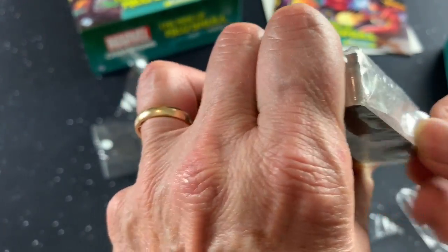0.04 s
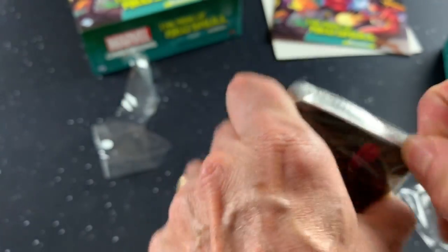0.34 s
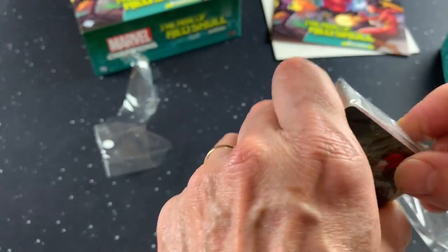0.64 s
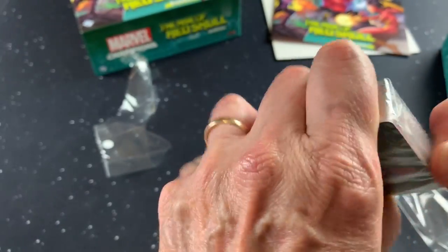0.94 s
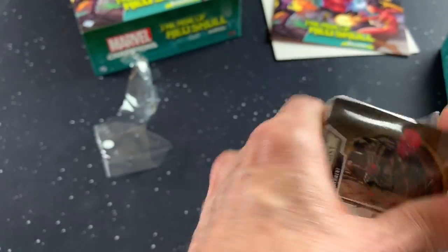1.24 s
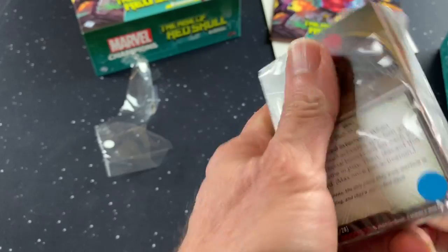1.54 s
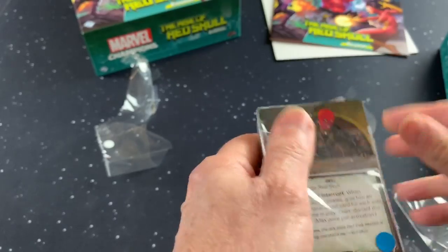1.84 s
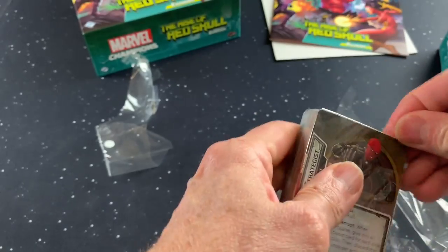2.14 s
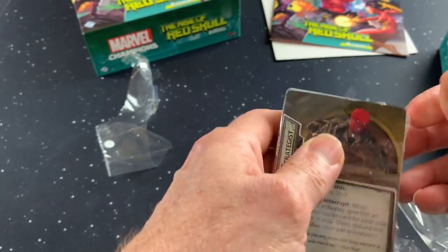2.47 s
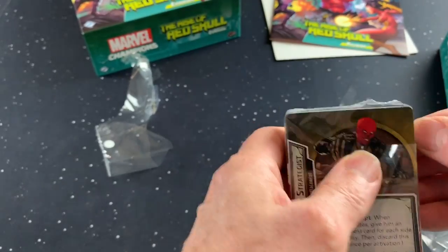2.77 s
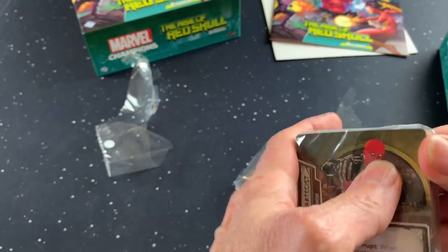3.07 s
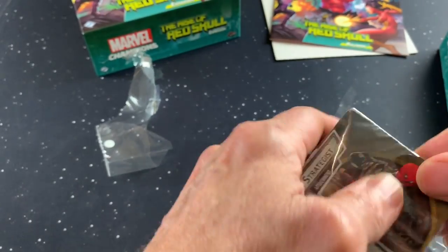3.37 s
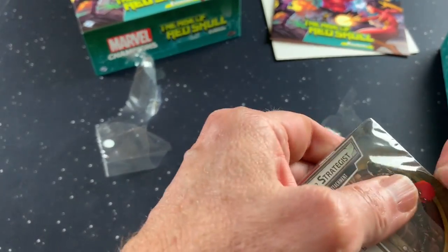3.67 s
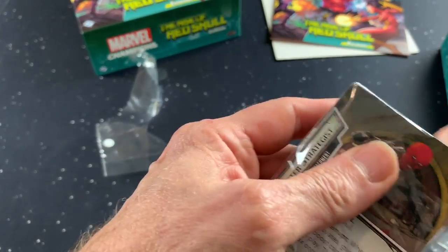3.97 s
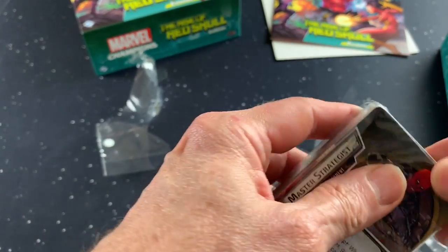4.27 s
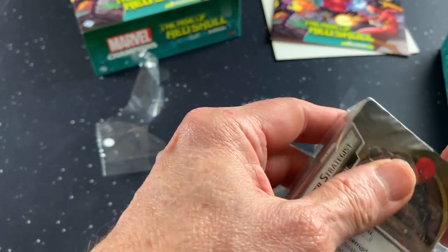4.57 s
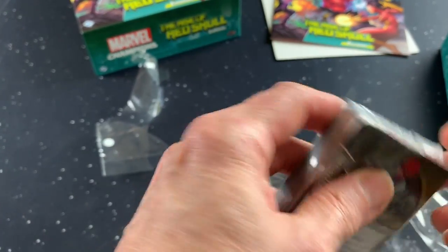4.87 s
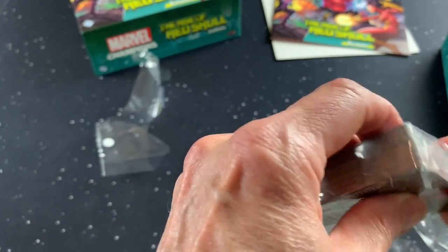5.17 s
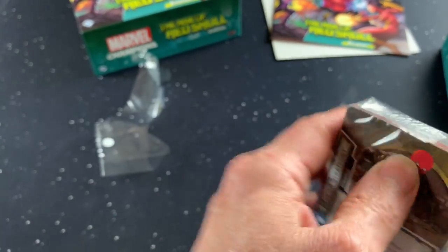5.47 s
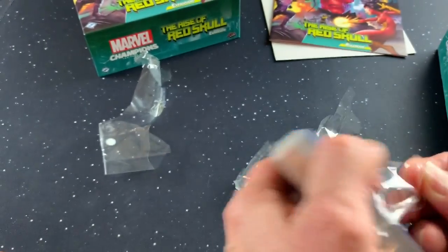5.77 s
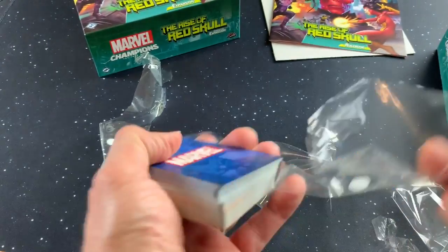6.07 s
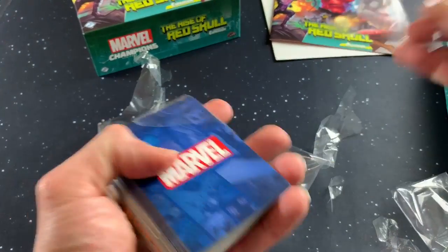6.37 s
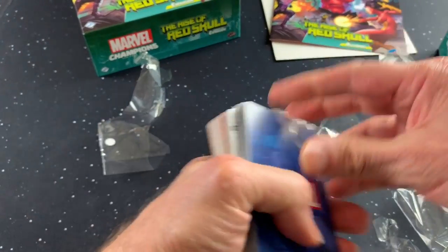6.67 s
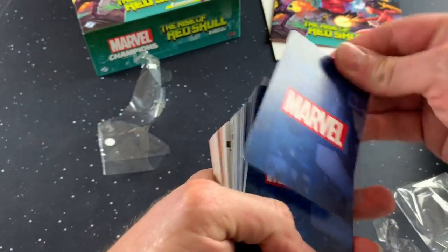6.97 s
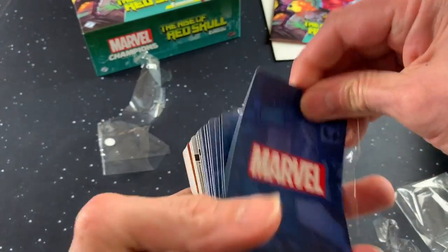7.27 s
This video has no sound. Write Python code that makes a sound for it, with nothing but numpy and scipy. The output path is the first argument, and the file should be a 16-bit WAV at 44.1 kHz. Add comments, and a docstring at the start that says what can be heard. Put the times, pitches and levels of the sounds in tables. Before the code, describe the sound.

Thin plastic wrap crackles and snaps as it is peeled off a deck of cards, with a low rumble from halfway.

```python
"""Shrink-wrap crinkles as it is picked open, peeled off a deck of cards and crumpled.
Each finger stroke buckles tiny creases into a fine crackle; larger creases snap, wide folds ring briefly.
Film and cards slide with a soft hiss and a few short rasps, and the deck rubs and bumps in the hand.
It all plays close to a two-port microphone on a table in a small room; a low rumble sets in halfway."""
import sys
import numpy as np
from scipy import signal
from scipy.fft import rfft, irfft, next_fast_len
from scipy.io import wavfile
from scipy.ndimage import uniform_filter1d, map_coordinates

SR = 44100
rng = np.random.default_rng(int(sys.argv[2]) if len(sys.argv) > 2 else 0)


def materialize(psi):
    """Save the field psi as 16-bit PCM at rate SR to the path in sys.argv[1].

    A 1-D psi becomes a single channel; in a 2-D psi each row is a channel.
    """
    bounded = np.clip(np.atleast_2d(psi).T, -1, 1)
    quanta = np.round(bounded * 32767).astype(np.int16)
    wavfile.write(sys.argv[1], SR, quanta)


N = 326781
TOP_HZ = 16700

# The four voices of the wrap. Each row: frequency in Hz, spectral density in dB.
TREBLE = [(5000, -109.5), (7600, -41), (8100, 4), (11000, 6), (12500, 2), (14000, -0.5), (15600, -2.5),
          (16100, -47), (17000, -3)]  # tiny facets of film
MIDDLE = [(1500, -56), (2500, 0), (3200, -1.5), (5000, 4.5), (7500, 8.5), (8300, 4.5), (11000, -96)]  # wider folds
BODY = [(40, -28), (200, -9.5), (500, -9), (850, -1), (1150, -67), (1700, 2), (2300, 0), (2900, 3.5),
        (3400, 5.5), (6000, -15)]  # the sheet lying on the deck
POCKET = [(60, -27), (140, -39), (400, -38), (650, -53), (870, -11), (1020, 2.5), (1180, 6), (1400, 6.5),
          (1600, 6.5), (1820, -6.5), (2300, 2), (3100, -37), (4500, -4)]  # air cupped under the loosened wrap
# How far the wrap cups into that pocket. Each row: time in seconds, share from 0 to 1.
CUPPED = [(0.2, 0.43), (0.225, 1), (0.55, 0.86), (0.6, 0.34), (1.1, 0.92), (1.2, 1), (1.62, 0.99),
          (1.75, 0.8)]
# Stereo width. Each row: frequency in Hz, each port's own sound in dB relative to the shared sound.
WIDTH = [(300, -12), (1400, -11), (2400, -1), (5000, 5), (7500, 2), (9500, -9)]


def amp(db):
    """Decibels to gain."""
    return 10 ** (np.asarray(db) / 20)


def unit(x):
    """Scale to rms 1."""
    return x / np.sqrt(np.mean(x ** 2) + 1e-20)


def along(points, hz):
    """Read (Hz, value) points on a log frequency axis."""
    knots_hz, values = np.transpose(points)
    return np.interp(np.log(hz + 1), np.log(knots_hz + 1), values)


def curves(rows, times):
    """Read each column after the time column at the given times."""
    knots_s, *columns = np.transpose(rows)
    return [np.interp(times, knots_s, column) for column in columns]


def filtered(x, response):
    """Shape x with a frequency response."""
    size = next_fast_len(N + 8192)
    return irfft(rfft(x, size) * response(np.fft.rfftfreq(size, 1 / SR)), size)[..., :N]


def noise(spectrum, width_db):
    """Coloured stereo noise of rms 1: a shared part plus each port's own."""
    pair = rng.standard_normal(N) + amp(width_db) * rng.standard_normal((2, N))
    return unit(filtered(pair, lambda hz: amp(along(spectrum, hz))))


def wobble(times, rate_hz):
    """A smooth random curve read at the given times."""
    return map_coordinates(rng.standard_normal(int(N * rate_hz / SR) + 4), [times * rate_hz])


def swells(rows, attack_s, sag_db_per_s, release_db_per_s):
    """A coarse clock and the power of each (start, hold, dB) gesture: rise, sagging hold, release."""
    t = np.arange(0, N, 64) / SR
    start, hold, db = np.transpose(rows)[:3, :, None]
    rise = np.clip((t - start) / attack_s + 1, 0, 1) ** 2
    sag_db = sag_db_per_s * (np.clip(t - start, 0, hold) - hold / 2)
    release_db = release_db_per_s * np.maximum(t - start - hold, 0)
    return t, (rise * amp(db - sag_db - release_db)) ** 2


def finger_work(times, grip_db=-61, grip_middle_db=-4, grip_body_db=-10):
    """Strokes work the film over a steady grip: treble in dB, then middle and body in dB relative to it."""
    # Pulls and squeezes. Each row: start and hold in seconds, treble in dB,
    # middle and body in dB relative to the treble.
    strokes = [(.005, .03, -50, 0, -10.5), (.06, .03, -44, -9, -7), (.12, .055, -39, 0.5, -5.5),
               (.18, .02, -30, -26, -13), (0.216, .025, -36, -23, -18), (.26, .01, -31, -13.5, -22),
               (0.294, .075, -36, -21, -18), (0.413, .05, -38, -17, -16.5), (.49, .04, -45, -13, -19),
               (0.614, .015, -47, -7, -5.5), (0.702, .035, -37, -17, -12), (.82, .05, -43, -3.5, -7.5),
               (0.939, .075, -28, -6, -13), (1.029, .04, -40, -19, -11), (1.171, .11, -39, -13, -14.5),
               (1.298, .1, -28, -15.5, -20.5), (1.515, .11, -41, -22, -21), (1.819, .05, -45, -8, -8.5),
               (1.929, .1, -44, -4.5, -7.5), (2.078, .035, -48, -7, -9.5), (2.185, .01, -50, -1, 2),
               (2.277, .035, -37, -10, -8), (2.445, .012, -46, -9, -24), (2.578, .07, -51, -5, -3.5),
               (2.679, .04, -47, 0.5, -6), (2.848, .03, -45, -2, -7), (2.934, .09, -42, -7.5, -7),
               (3.11, .07, -45, -5, -4.5), (3.225, .045, -48, -1.5, -10), (3.317, .04, -50, 1, -5),
               (3.391, .08, -45, -3.5, -7.5), (3.719, .01, -40, -14, -16), (3.765, .135, -41, -3.5, -8),
               (3.929, .035, -48, -8, -7), (4.125, .05, -45, -5.5, -10.5), (4.236, .03, -47, -10, -13.5),
               (4.29, .035, -52, 4, -10), (4.407, .04, -54, -4, -3), (4.509, .012, -47, -6, -4.5),
               (4.559, .02, -47, 0, -16), (4.626, .015, -56, -6, 3.5), (4.705, .03, -48, -5, -8),
               (4.775, .03, -51, 2, -7), (4.887, .07, -52, 4, 0.5), (4.996, .11, -43, -4, -7.5),
               (5.14, .035, -42, 0, -8.5), (5.289, .13, -42, -5, -6), (5.495, .04, -42, 2, -0.5),
               (5.565, .06, -38, -4.5, -4), (5.716, .055, -31, -3, -7), (5.825, .07, -34, -3, -3.5),
               (5.905, .035, -32, 1.5, -0.5), (5.954, .05, -24, -10, -8), (6.03, .03, -41, -19, -24),
               (6.094, .065, -34, -6, -7), (6.295, .04, -47, 4.5, -2.5), (6.409, .02, -42, -7, -3.5),
               (6.514, .05, -47, -1, -3.5), (6.6, .03, -52, -4, -5.5), (6.699, .05, -36, -2.5, -4),
               (6.765, .045, -32, -2, -12), (6.82, .025, -40, -18, -14), (6.891, .045, -38, 0.5, -1),
               (6.985, .025, -41, -2.5, -4), (7.03, .025, -32, -3.5, -8), (7.08, .14, -41, -3.5, -2.5),
               (7.3, .11, -42, -2, 0.5)]
    t, power = swells(strokes, attack_s=.016, sag_db_per_s=12, release_db_per_s=200)
    treble = power.sum(0) + amp(grip_db) ** 2
    lower_grip = amp(grip_db + np.array([[grip_middle_db], [grip_body_db]])) ** 2
    lower = amp(np.transpose(strokes)[3:]) ** 2 @ power + lower_grip
    return [np.interp(times, t, 10 * np.log10(band)) for band in (treble, *(lower / treble))]


def voice_gains(times, treble_db, middle_db, body_db):
    """Gains of the four voices: where the wrap is cupped, the pocket takes over from the sheet."""
    cupped = np.clip(curves(CUPPED, times)[0], 0, 1)
    sheet, pocket = amp(body_db) * np.sqrt([1 - cupped, cupped])
    return amp(treble_db) * np.array([np.ones(len(times)), amp(middle_db), sheet, pocket])


def pops(times, gains, ring_db, ring_t60, colour_db, size=256, bands=16):
    """Each buckling facet sends out one short pulse of its own colour, and the film rings on briefly."""
    hz, t = np.fft.rfftfreq(size, 1 / SR), np.arange(size) / SR
    voices = np.array([unit(amp(along(voice, hz))) for voice in (TREBLE, MIDDLE, BODY, POCKET)])
    # every facet has its own resonances
    knots = np.linspace(0, 1, bands)
    humps = np.array([np.interp(np.sqrt(hz / TOP_HZ), knots, row) for row in np.eye(bands)])
    colour = amp(colour_db * rng.standard_normal((len(times), bands)) @ humps)
    spectrum = gains.T @ voices * colour / np.sqrt(np.mean(colour ** 2, axis=1, keepdims=True))
    # minimum phase packs the energy into the attack
    cepstrum = irfft(np.log(spectrum + 1e-7))[:, :size // 2] * np.r_[1, np.full(size // 2 - 1, 2)]
    polarity = np.sign(rng.standard_normal((len(times), 1)))  # creases flip either way
    pulse = np.exp(rfft(cepstrum, size)) * polarity
    # bending waves run on through the film; its wrinkles scatter the pulse differently to each port
    fade = amp(-60 * t / np.array([[ring_t60], [.004], [.004]])) * (t > 0)
    fade /= np.linalg.norm(fade, axis=1, keepdims=True)
    waves = rfft(rng.standard_normal((len(times), 3, size)) * fade)
    ring, width = amp(ring_db), amp(along(WIDTH, hz))
    paths = (1 + ring * waves[:, :1] + width * waves[:, 1:]) / np.sqrt(1 + ring ** 2 + width ** 2)
    sound = irfft(pulse[:, None] * paths)
    index = np.clip(np.round(times * SR).astype(int)[:, None] + np.arange(size), 0, N).ravel()
    return np.array([np.bincount(index, sound[:, port].ravel(), N + 1)[:N] for port in range(2)])


def crinkle(count=3400, spread_db=8.5, crowding=.75, jerk_db=2):
    """Tiny creases give way at random: the harder the film is worked, the denser and louder they get."""
    t = np.arange(N) / SR
    effort = amp(finger_work(t)[0]) ** crowding
    chance = count * effort / effort.sum()  # creases per sample
    times = np.interp(np.arange(count) + rng.uniform(-2, 2, count), np.cumsum(chance), t)
    size = amp(spread_db * np.clip(rng.standard_normal(count), -2, 2))
    # neighbouring creases share the work of the hand
    size /= np.sqrt(uniform_filter1d(size ** 2, size=24) * np.interp(times, t, chance))
    size *= amp(jerk_db * wobble(times, rate_hz=45))  # the film gives way in jerks
    gains = size * voice_gains(times, *finger_work(times))
    return amp(-4) * pops(times, gains, ring_db=-3, ring_t60=.015, colour_db=4.5)


def slide():
    """Film gliding over card and skin hisses under the crinkle and sounds the pocket of air."""
    t = np.arange(N) / SR
    treble, middle, body, pocket = voice_gains(t, *finger_work(t))
    fizz = amp(-9) * treble * noise(TREBLE, width_db=-5)
    hiss = amp(-7) * middle * noise(MIDDLE, width_db=4)
    sheet = amp(-3.5) * body * noise(BODY, width_db=-3)
    hollow = amp(-18.5) * pocket * noise(POCKET, width_db=-9)
    return fizz + hiss + sheet + hollow


def small_snaps(count=70, crowding=.5, above_db=6, spread_db=2.5, dull_db=-5, growth=0.8):
    """Lesser creases go at random as the film is worked: rows of time, treble, relative middle and body."""
    t = np.arange(0, N, 64) / SR
    effort_db = finger_work(t)[0]
    tally = np.cumsum(amp(effort_db) ** crowding)
    times = np.interp((np.arange(count) + rng.uniform(0, 1, count)) / count, tally / tally[-1], t)
    treble_db, middle_db, body_db = finger_work(times)
    size_db, tint_db = spread_db * np.clip(rng.standard_normal((count, 2)), -2, 2).T
    level_db = effort_db.mean() + growth * (treble_db - effort_db.mean()) + above_db + size_db
    return np.transpose([times, level_db, middle_db + dull_db + tint_db, body_db + dull_db + tint_db])


def snaps(neighbours=3, buckle_s=.001, cluster_s=.0022, cluster_db=-8, lone_db=-7, lone_crest_db=11):
    """A crease snaps through and sets off its neighbours; the spikier the snap, the fainter they are."""
    # The loudest creases. Each row: start in seconds, peak in dB (sets the spikiness), treble in dB,
    # middle and body in dB relative to the treble.
    creases = [(0.0568, -32, -30, -11, -10.5), (0.0853, -13, -30, -7, -23), (0.1377, -20.5, -32, -12, -20),
               (0.1549, -17, -30.5, -10, -18.5), (0.1812, -12, -25.5, 6, -22), (0.1872, -11, -22, -2, -21),
               (0.1903, -9, -23, -5, -8), (0.256, -16, -27, -26, -43), (0.2591, -13, -26.5, -6.5, -38),
               (0.2616, -9, -19.5, -39, -31), (0.2889, -6, -20, -36, -48.5), (0.3108, -9, -20.5, -47, -44),
               (0.338, -11, -20.5, -23, -16.5), (0.4209, -10, -23, -38, -23), (0.4752, -12, -24, -18, -47),
               (0.5228, -1, -17, -22, -44), (0.6157, -22, -36.5, 2, -13), (0.669, -18, -33, 2, -8),
               (0.7055, -15, -29, -6, -20), (0.7115, -17, -36, 7.5, -0.5), (0.7255, -8, -24, 3.5, -11),
               (0.8922, -17, -23.5, -20, -14.5), (0.9462, -12, -26, -19, -36), (0.958, -8, -20.5, -5, -29),
               (0.9801, -5, -21.5, -6, -15), (0.9963, 12, -16.5, -0.5, -23), (1.0034, -11, -14.5, -23, -38),
               (1.0389, -21, -37, -17, -18), (1.1682, -16, -29, -17, -47), (1.184, -17, -27, -31, -38),
               (1.1993, -19, -30, -12, -31), (1.2424, -23, -26, -12.5, -29.5),
               (1.2955, -17, -22.5, -15, -17), (1.303, -10, -24.5, -12.5, -13),
               (1.337, -14, -20.5, -18, -22), (1.3943, -5, -25, -23, -11), (1.5134, -19, -28.5, -25, -19),
               (1.5692, -12, -26, -28, -42), (1.5986, -11, -22, -31, -34), (1.763, -31, -35, -14, -43),
               (1.8496, -22, -30.5, -11, -38), (1.871, -16, -28, -12, -29), (1.9651, -31, -27.5, -7.5, -18),
               (2.0232, -35, -37.5, -4.5, -33), (2.0835, -20, -33, 0.5, -28),
               (2.2602, -23, -39.5, 2.5, -11), (2.4079, -16, -31, -16, -28), (2.4465, -25, -35.5, 0, -9.5),
               (2.599, -31, -34.5, -10, -37), (2.6388, -19, -31, -0.5, -42), (2.6995, -18, -29.5, -10, -20),
               (2.7952, -23.5, -31.5, -16, -20), (2.9215, -15, -26.5, -12, -15.5),
               (3.0154, -11, -26, -22, -15.5), (3.2602, -21, -29, -18, -36), (3.386, -21, -32, -10, -17),
               (3.4198, -15, -28, -27, -29), (3.6049, -9, -36, -5, -8), (3.6701, -11, -30.5, -15, -19),
               (3.7187, -25, -25, -8, -20), (3.7281, -15, -32.5, 0.5, -6),
               (3.7644, -13, -26.5, -2.5, -11.5), (3.8339, -21, -28, -21, -21),
               (3.9067, -23, -33, -13, -22), (3.9333, -27, -42, -9, -10), (4.1294, -27, -38, -23, -9),
               (4.1648, -22, -31.5, -15, -35), (4.1976, -27, -34, -6, -25), (4.2275, -21, -27, -9.5, -41),
               (4.293, -25, -40, -13, -16), (4.32, -23, -40, -6, -17), (4.4448, -20, -30.5, -9.5, -42),
               (4.5067, -25, -33.5, -7.5, -30), (4.5487, -15, -29, 0, -46), (4.6824, -20, -34.5, -3.5, -31),
               (4.717, -14, -27.5, -22, -29), (4.771, -18, -29.5, -19, -20), (4.776, -17, -37, 1, -18),
               (4.8013, -22, -33, -15, -19), (4.8878, -12, -27.5, -14, -37), (4.9976, -26, -32, -8, -13.5),
               (5.0106, -8, -25, -11, -32), (5.095, -27, -29.5, -11, -27), (5.1643, -19, -38, 11, -10),
               (5.2363, -18, -31.5, -10, -50), (5.2958, 5, -28, -7.5, -25), (5.3198, -11, -30, -17, -18),
               (5.3292, -16, -27, -5.5, -37), (5.3905, -24, -24.5, -12.5, -32),
               (5.4333, -19, -27.5, -17, -14.5), (5.4865, -7, -20, -10, -16.5),
               (5.516, -16, -25.5, -20, -18), (5.5662, -15, -26.5, -19, -6.5),
               (5.5837, -14, -24.5, -11, -3.5), (5.602, -20, -34, -14, -3), (5.6258, -17, -40, -17, -19),
               (5.6463, -16, -27, -14, -35), (5.7152, -3, -17.5, 3, -12), (5.7428, -15, -23.5, -12, -15),
               (5.8207, -9, -22, 1, -16), (5.859, -6, -17, -13, -23), (5.8796, -15, -26, -16, -1.5),
               (5.9018, -23, -30.5, -2, 6.5), (5.931, -11, -28, 0, -13), (5.95, -7, -21, -7, -8),
               (5.9699, -7, -22, -15, -12), (5.9944, -10, -23, -4, -20), (6.021, -11, -40, -30, -22),
               (6.097, -10, -24.5, -29, -29), (6.1024, -10, -23, -24, -32), (6.11, -13, -20.5, -10, -15),
               (6.2006, -21, -34, -25, -16), (6.3256, -21, -31.5, -4, -25), (6.3378, -19, -35, -16, -36),
               (6.4129, -19, -28.5, -2.5, -29), (6.5091, -15, -39, 8.5, -8), (6.707, -16, -33, -13, 1),
               (6.7694, -12, -22, -17, -18), (6.8035, -9, -25, -11, -8), (6.874, -11, -20.5, -14, -27),
               (7.0312, -11, -22, -17, -9), (7.0949, -11, -26.5, -30, -35), (7.2091, -24, -36.5, 4.5, -1.5),
               (7.258, -22, -34.5, -1, -28), (7.337, -13, -24, -38, -30.5)]
    loud = np.delete(creases, 1, axis=1) + [buckle_s, 0.5, -1, -1]  # time to flip, three trims in dB
    small = small_snaps()
    starts, treble_db, middle_db, body_db = np.vstack([loud, small]).T
    crest_db = np.transpose(creases)[1] - np.transpose(creases)[2]
    alone = np.r_[np.clip(crest_db / lone_crest_db, 0, 1), rng.uniform(0, 1, len(small))][:, None] ** 2
    gains = np.sqrt(.003 * SR) * voice_gains(starts, treble_db, middle_db, body_db)
    cracks = pops(starts, gains, ring_db=-7, ring_t60=.012, colour_db=2.6)
    scatter = rng.standard_normal((len(starts), 2, neighbours))
    tick_times = starts[:, None] + np.abs(cluster_s * (scatter[:, 0] + .5))
    tick_sizes = amp(cluster_db + lone_db * alone + 3.5 * np.clip(scatter[:, 1], -2, 2))
    tick_gains = (gains[..., None] * tick_sizes).reshape(len(gains), -1)
    return cracks + pops(tick_times.ravel(), tick_gains, ring_db=-5, ring_t60=.012, colour_db=5)


def deck_rub(drag_db=-63.5, drag_growth=0.42, lifted_db=-12):
    """Fingers drag dully on the deck with each stroke, less once the wrap lifts, and rub firmly at times."""
    # The firm rubs. Each row: start in seconds, hold in seconds, level in dB.
    rubs = [(.17, 0.028, -63), (.72, .02, -65), (.93, 0.055, -55.5), (1.395, 0.0087, -60),
            (1.93, 0.18, -67.5), (2.29, 0.023, -63), (2.66, 0.16, -67), (2.92, 0.045, -61.5),
            (3.85, 0.2, -66), (5.71, 0.012, -40.5), (5.9, 0.098, -37.5), (6.09, 0.054, -47),
            (7.03, 0.036, -51), (7.19, 0.018, -48.5), (7.3, 0.017, -46.5), (7.38, 0.024, -42.5)]
    # The deck's dull tone. Each row: frequency in Hz, spectral density in dB.
    deck_tone = [(80, -22), (220, 1), (500, 3), (750, -3.5), (1000, -13), (2000, -16)]
    t, power = swells(rubs, attack_s=0.0066, sag_db_per_s=11, release_db_per_s=290)
    treble_db, _, body_db = finger_work(t)
    push_db = treble_db + body_db
    drag = amp(drag_db + drag_growth * (push_db - push_db.mean()) + lifted_db * curves(CUPPED, t)[0])
    envelope = np.interp(np.arange(N) / SR, t, np.sqrt(power.sum(0) + drag ** 2))
    return envelope * noise(deck_tone, width_db=-3)


def folds(t60=0.014, attack_s=0.0012, size=1536):
    """A wide fold flips and rings for a few milliseconds at a rough, unsteady pitch."""
    # Each row: start in seconds, pitch in Hz, level in dB.
    flips = [(0.182, 2940, -31), (0.41, 1160, -47), (1.002, 1300, -38), (1.398, 1180, -39.5),
             (2.29, 1820, -35.5), (2.856, 1690, -40.5), (3.602, 1448, -48.5), (3.79, 2160, -44),
             (3.842, 2570, -37), (4.321, 2200, -40.5), (4.631, 2090, -46.5), (4.802, 2360, -48),
             (5.485, 2910, -33), (5.749, 1270, -48), (5.903, 2350, -27), (5.934, 3000, -26.5),
             (5.96, 2800, -28), (6.021, 3470, -24), (6.775, 2510, -23), (7.03, 3080, -30.5)]
    out, t = np.zeros((2, N + size)), np.arange(size) / SR
    for start, hz, db in flips:
        waver = .22 * unit(uniform_filter1d(rng.standard_normal(size), size=40))
        phase = 2 * np.pi * hz * np.cumsum(1 + waver) / SR
        port_phase = amp(along(WIDTH, hz)) * rng.standard_normal((2, 1)) / 2
        envelope = amp(db + 14.5 - 60 * t / t60) * (1 - np.exp(-t / attack_s))
        out[:, round(start * SR):][:, :size] += envelope * np.sin(phase + port_phase)
    return out[:, :N]


def deck_bumps(attack_s=0.0011):
    """The wrap gives way and the deck lands softly against the fingers."""
    # Each row: start in seconds, level in dB.
    jolts = [(0.187, -49), (0.995, -53), (1.396, -49.5), (2.925, -55.5)]
    # Resonances of deck and palm. Each row: frequency in Hz, level in dB, time to fall 60 dB in seconds.
    modes = [(151, -1, 0.042), (239, 2, 0.037), (329, 10, 0.035)]
    out, t = np.zeros(N + SR), np.arange(SR // 8) / SR
    for start, db in jolts:
        thud = sum(amp(db + mode_db - 60 * t / t60) * np.sin(2 * np.pi * hz * rng.uniform(0.98, 0.99) * t)
                   for hz, mode_db, t60 in modes)
        out[round(start * SR):][:len(t)] += thud * (1 - np.exp(-t / attack_s))
    return out[:N]


def rasps(bandwidth=0.12):
    """Film and cards stick and slip: each rasp swells and fades in one resonance of the stretched film."""
    # Each row: start in seconds, length in seconds, pitch in Hz, level in dB.
    slips = [(1.362, 0.027, 1270, -37.5), (2.273, 0.049, 2870, -42), (3.425, 0.049, 2600, -48.5),
             (6.772, 0.056, 2204, -39)]
    skirt = [(-4, -60), (-1, -7), (0, 0), (1, -7), (4, -60)]  # bandwidths off pitch, level in dB
    out, t = np.zeros((2, N)), np.arange(N) / SR
    for start, length, hz, db in slips:
        band = [(hz * (1 + step * bandwidth), skirt_db) for step, skirt_db in skirt]
        envelope = np.sin(np.pi * np.clip((t - start) / length, 0, 1))
        out += amp(db) * envelope * noise(band, along(WIDTH, hz))
    return out


def rumble(early_db=-73):
    """Faint room tone and a few soft thumps, then a low, uneven rumble, nearly alike at both ports."""
    # The rumble's course. Each row: time in seconds, deep level in dB, upper level in dB.
    levels = [(3.28, -70, -83), (3.39, -44, -48.5), (3.56, -59, -42.5), (4.22, -65, -41.5),
              (4.38, -68, -50), (4.48, -56, -37), (4.83, -57, -47), (4.97, -33.5, -36.5),
              (5.11, -36, -36.5), (5.19, -41, -40.5), (5.35, -46, -41), (5.37, -35.5, -36.5),
              (5.56, -51, -47), (5.81, -56.5, -44), (6.39, -48.5, -53.5), (7.09, -41.5, -43),
              (7.35, -51, -50), (7.41, -51, -58.5)]
    # Low swells, perhaps the hands shifting. Each row: start in seconds, hold in seconds, level in dB.
    low_swells = [(.73, 0.11, -63), (1.0, 0.016, -53), (1.97, 0.029, -57), (2.3, 0.036, -59.5),
                  (2.7, 0.17, -61.5)]
    # Both rumble layers and the room tone. Each row: frequency in Hz, spectral density in dB.
    deep_tone = [(20, -43), (32, -18), (44, -4), (60, 2.5), (80, -25.5), (120, -9), (250, -59)]
    upper_tone = [(50, -1), (90, 2.5), (125, 3), (200, -0.5), (250, -10.5), (320, -12), (420, -24),
                  (700, -46), (2000, -61)]
    room_tone = [(30, 36), (150, 6), (400, 27), (900, -19), (3000, -14), (10000, 0), (15000, 31)]
    t = np.arange(N) / SR
    deep_db, upper_db = np.where(t < levels[0][0], early_db, curves(levels, t))
    clock, power = swells(low_swells, attack_s=0.037, sag_db_per_s=9.2, release_db_per_s=370)
    thumps = np.interp(t, clock, np.sqrt(power.sum(0)))
    deep = (amp(deep_db - 1.5) + thumps) * noise(deep_tone, width_db=-13)
    upper = (amp(upper_db - 1) + amp(-7.5) * thumps) * noise(upper_tone, width_db=-11)
    return deep + upper + amp(-95) * noise(room_tone, width_db=3)


def ports(hz, left_lag_s=.000297):
    """The right port faces the film: it hears more of the middle, and the treble reaches it first."""
    # Each row: frequency in Hz, left minus right in dB.
    lean = [(300, 3.5), (800, -3.5), (2000, 1), (2900, 0.5), (4000, 0), (5300, -3.5), (7500, -2), (10000, 0)]
    lag_s = left_lag_s * np.clip((hz - 4000) / 4000, 0, 1)
    sides = np.array([[.5], [-.5]])
    return amp(sides * along(lean, hz)) * np.exp(-2j * np.pi * hz * lag_s * sides)


def room(x, near_db=-15, near_t60=0.056, tail_db=-15):
    """Hands and table scatter the sound at once; the walls add a short diffuse tail."""
    # Each row: frequency in Hz, time to fall 60 dB in seconds.
    decay = [(200, 0.15), (2000, 0.43), (8000, 0.16), (16000, 0.17)]
    hz, frame_s, spectra = signal.stft(rng.standard_normal((2, SR // 2)), SR, nperseg=256)
    tail = signal.istft(spectra * amp(-60 * frame_s / along(decay, hz)[:, None]), SR, nperseg=256)[1]
    t = np.arange(tail.shape[1]) / SR
    tail *= t > .005
    near = rng.standard_normal(tail.shape) * amp(-60 * t / near_t60) * (t > .0015)
    answer = amp(near_db) * near / np.linalg.norm(near[0]) + amp(tail_db) * tail / np.linalg.norm(tail[0])
    return signal.fftconvolve(x, answer, axes=1)[:, :N]


def scene():
    """The film in its room, with the handling of the deck and the rumble."""
    film = filtered(snaps() + folds() + crinkle() + rasps() + slide(), ports)
    return film + room(film) + deck_rub() + deck_bumps() + rumble()


def record(dry):
    """A steep low cut sheds the deepest bass, and nothing passes above the band limit."""
    return filtered(dry, lambda hz: (hz < TOP_HZ) * hz ** 8 / (hz ** 8 + 31 ** 8))


dry = scene()
out = record(dry)
materialize(out)
```